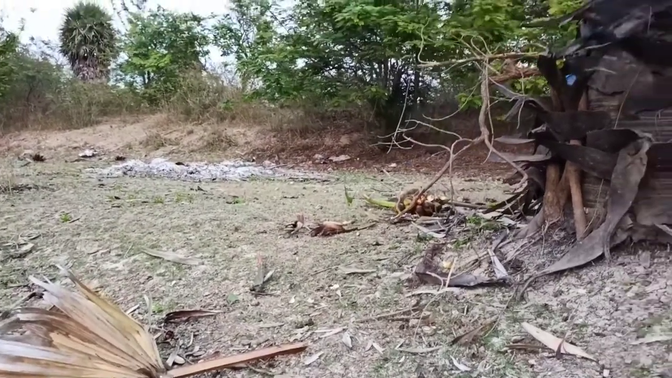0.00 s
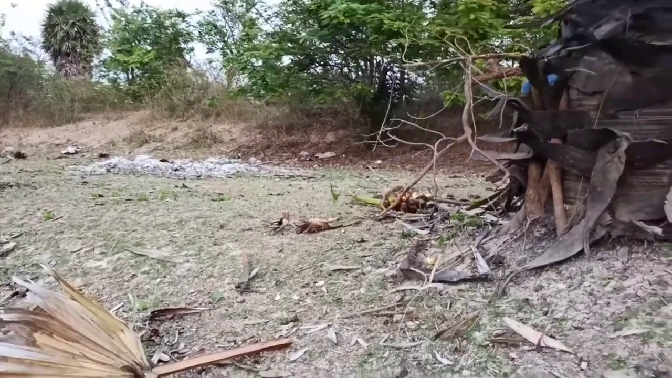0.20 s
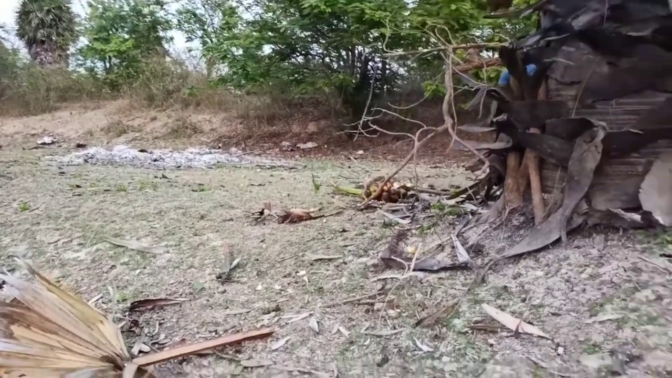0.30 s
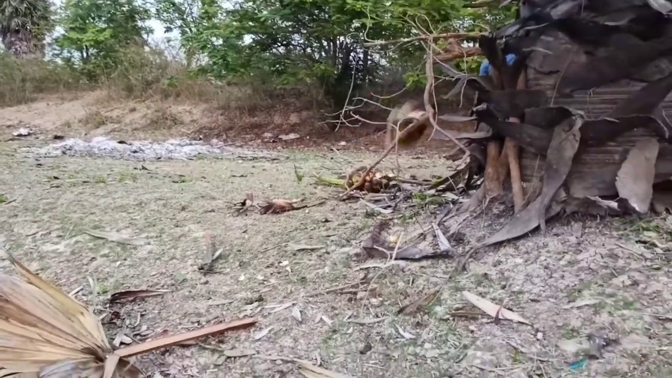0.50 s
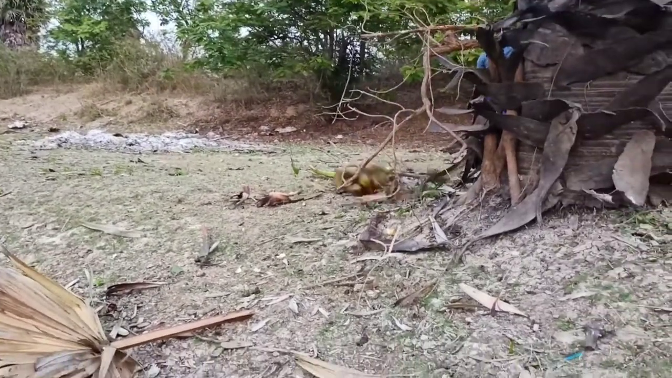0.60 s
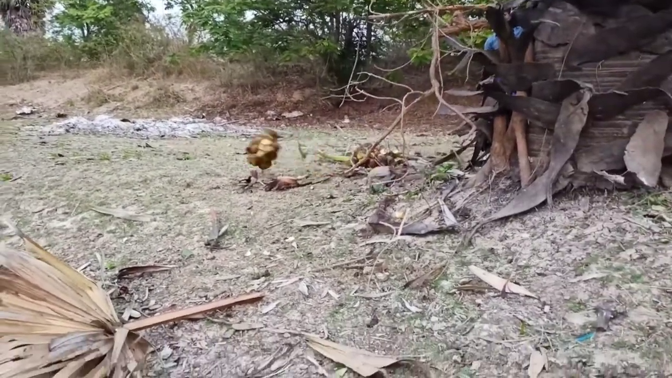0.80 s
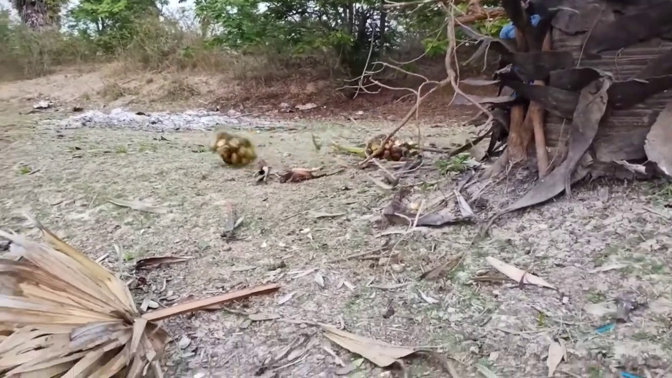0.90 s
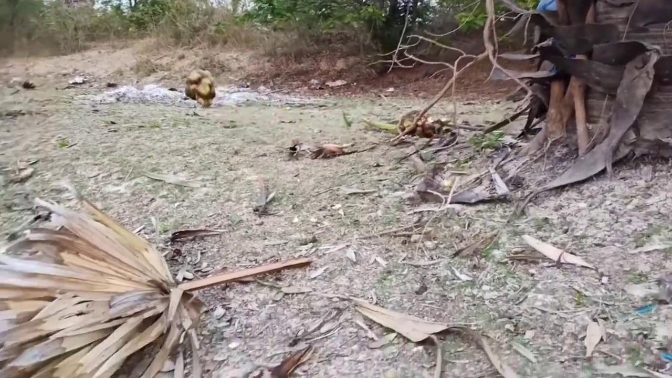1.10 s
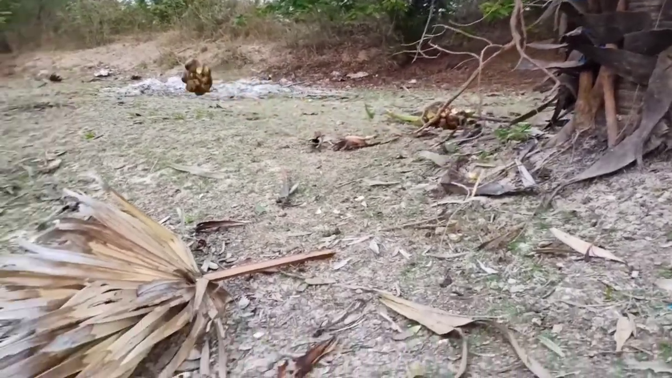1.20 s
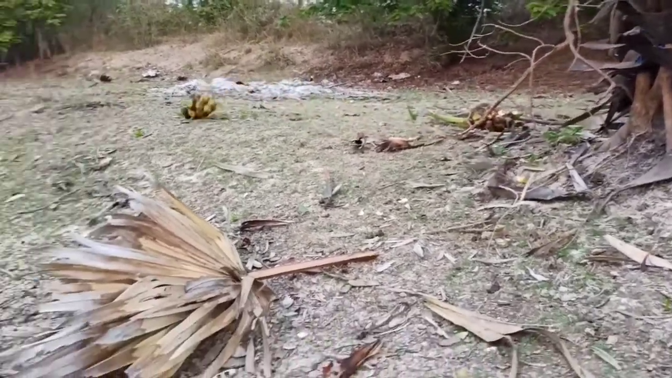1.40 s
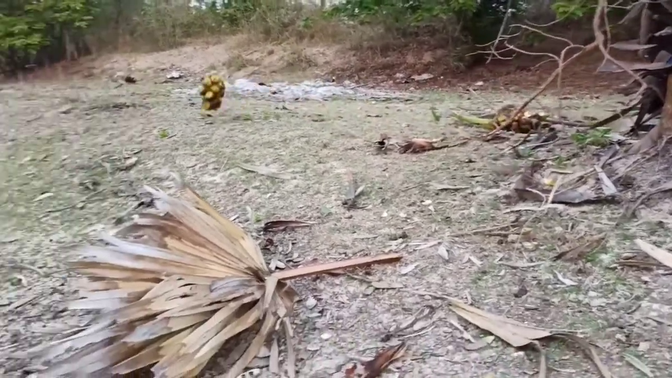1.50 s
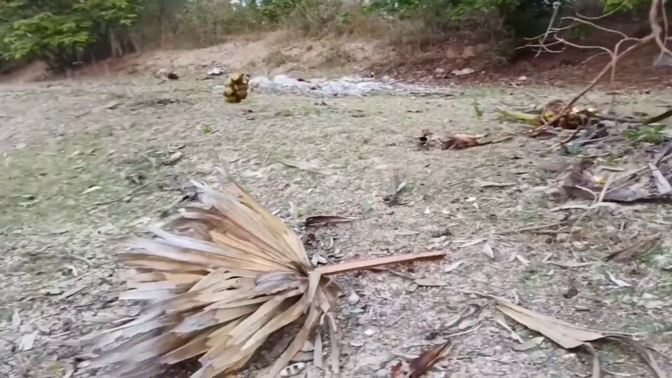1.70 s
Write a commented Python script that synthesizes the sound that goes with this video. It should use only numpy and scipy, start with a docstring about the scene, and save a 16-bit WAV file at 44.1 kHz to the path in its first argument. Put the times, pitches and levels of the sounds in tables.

```python
"""Under quiet open air, coloured noise, a heavy fruit bunch drops through dead fronds on a palm trunk.
Dry leaf crackles as a crowd of tiny fractures, hollow stalks knock as short decaying modes, and twigs
and leaf ribs snap in bursts of fractures that ring the broken piece, on through the whole scene.
The bunch lands, bounces and rolls away: low thuds and rumble, crunching and rustling litter, knocks
on a woody stem, and a clatter of fruits at three landings. A short scatter of echoes follows it all."""
import sys
import numpy as np
from scipy import signal
from scipy.fft import rfft, irfft, next_fast_len
from scipy.io import wavfile

SR = 44100
rng = np.random.default_rng(int(sys.argv[2]) if len(sys.argv) > 2 else 0)


def generate_wav(sig):
    """Save sig (samples, or channels by samples) to the path in sys.argv[1] as 16-bit PCM at SR."""
    pcm = np.round(np.clip(np.atleast_2d(sig).T, -1, 1) * 32767).astype(np.int16)
    wavfile.write(sys.argv[1], SR, pcm)


N = 79380
T = np.arange(N) / SR

# Shaking of the hanging fronds. Each row: time in seconds, leaf level in dB, stalk rattle level in dB.
SHAKE = [(0, -54.5, -90), (.165, -91, -90), (.175, -51, -47), (.197, -44.5, -36.5), (.204, -33.5, -37.5),
         (.265, -27, -26), (.295, -33, -30), (.315, -40.5, -46), (.336, -42.5, -53), (.355, -23, -20),
         (.415, -20, -26.5), (.452, -22, -19), (.475, -25, -31), (.505, -31.5, -35.5), (.54, -44, -47.5),
         (.6, -40.5, -50), (.7, -57, -71)]
# Tone colour of crushed dry litter. Each row: frequency in Hz, gain in dB.
LITTER = [(150, 1.5), (400, -4), (800, 0), (1100, -6), (1600, -5), (3000, -5.5), (4500, -2), (6800, 0.5),
          (8500, -7), (10500, -15.5), (15500, -13.5)]


def undb(db):
    """Decibels to gain."""
    return 10 ** (np.asarray(db) / 20)


def unit(x):
    """Scale to rms 1."""
    return x / np.sqrt(np.mean(x ** 2) + 1e-18)


def add(out, s, x):
    """Mix x into out from time s in seconds."""
    i = int(s * SR)
    out[i:i + len(x)] += x[:len(out) - i]


def curve(table, column):
    """Gain over time, gliding in dB between the rows of one column."""
    rows = np.array(table)
    return undb(np.interp(T, rows[:, 0], rows[:, column]))


def colour(x, points, centre_hz=None):
    """Causal filter through (Hz, dB) points, with an optional broad resonance."""
    resonance_octaves, skirt_db = 0.51, -13.5  # width of the resonance; level far away from it
    size = next_fast_len(len(x) + 2048, real=True) // 2 * 2
    octave = np.log2(np.arange(size // 2 + 1) * SR / size + 1)
    rows = np.array(points)
    gain = undb(np.interp(octave, np.log2(rows[:, 0]), rows[:, 1]))
    if centre_hz:
        distance = (octave - np.log2(centre_hz)) / resonance_octaves
        gain = gain * (undb(skirt_db) + np.exp(-.5 * distance ** 2))
    # fold the cepstrum forward in time: minimum phase, so nothing sounds ahead of its cause
    cepstrum = irfft(np.log(gain))
    cepstrum[1:size // 2] *= 2
    cepstrum[size // 2 + 1:] = 0
    return irfft(rfft(x, size) * np.exp(rfft(cepstrum)))[:len(x)]


def grains(n, rate, spread_db):
    """Tiny fractures at random moments, rate per second, with random signs and sizes, at rms 1."""
    when, sign, size = rng.random((3, n))
    happens = when < rate / SR
    size_db = spread_db * np.minimum(-np.log(1 - size), 4)  # capped exponential spread
    return unit(happens * np.sign(sign - .5) * undb(size_db))


def ring(hz, rise, t60):
    """One mode, pushed for a moment and then dying away."""
    t = T[:SR // 4]
    push = np.sin(np.pi / 2 * np.minimum(t / rise, 1)) ** 2
    decay = np.exp(-np.log(1000) * np.maximum(t - rise, 0) / t60)
    return push * decay * np.sin(2 * np.pi * hz * t)


def ping(hz, t60):
    """A freely dying sine."""
    t = T[:SR // 10]
    return np.sin(2 * np.pi * hz * t) * undb(-60 * t / t60)


def excite(x, hz, t60):
    """One resonance driven by x, at rms 1."""
    return unit(signal.fftconvolve(x, ping(hz, t60))[:len(x)])


def burst(length, release, rate, spread_db):
    """A bunch of fractures that sags a little over its length and then dies out."""
    t = T[:SR // 10]
    envelope = np.exp(-np.maximum(t - length, 0) / release - .5 * np.minimum(t / length, 1))
    return envelope * grains(len(t), rate, spread_db)


def held(x, db, length):
    """Scale a burst to the energy of that level held for that length."""
    return undb(db) * x * np.sqrt(length * SR / np.sum(x ** 2))


def flutter():
    """A gain that jumps each time the leaf lets go and quickly falls back to a steady rustle."""
    fits_per_s, release_s, steady_db = 260, .0025, -2.5
    jumps = grains(N, fits_per_s, spread_db=1.8) ** 2
    power = signal.lfilter([1], [1, -np.exp(-2 / (release_s * SR))], jumps)
    return np.sqrt(power / np.mean(power) + undb(steady_db) ** 2)


def crackle(points, rate, spread_db, shred_db, shred_rate, count=28):
    """Dry leaf: fine fractures mixed with ticks of shreds that each have their own pitch."""
    low_hz, high_hz, shred_t60_s = 1247, 8080, 0.016
    pitches = low_hz + (high_hz - low_hz) * (np.arange(count) + rng.random(count)) / count
    shreds = sum(excite(grains(N, shred_rate, spread_db=2.5), hz, shred_t60_s) for hz in pitches)
    leaf = grains(N, rate, spread_db) + undb(shred_db) * unit(shreds)
    return unit(flutter() * colour(leaf, points))


def breaks(table, release, rate, spread_db, piece_db):
    """Dry fibres give way in a burst of fractures that sets the broken piece ringing."""
    # Tone colour of breaking fibre. Each row: frequency in Hz, gain in dB.
    fibre = [(100, -20), (400, -9), (800, -5), (1600, 2), (4000, -0.5), (7200, 3), (8800, -7), (11000, -3),
             (15500, -9)]
    first_crack_db, piece_t60_s = -3, .018
    out = np.zeros(N)
    for s, db, hz, length, piece_hz in table:
        cracks = burst(length, release, rate, spread_db)
        cracks[0] += undb(first_crack_db)  # the fracture that starts the burst
        piece = undb(piece_db) * excite(cracks, piece_hz, piece_t60_s)
        add(out, s, held(unit(colour(cracks, fibre, hz)) + piece, db, length))
    return out


def air():
    """Quiet open air: steady noise, strongest in the low and middle range."""
    # Tone colour of the air. Each row: frequency in Hz, gain in dB.
    air_colour = [(30, -29), (168, -1), (360, -7), (505, -2), (830, -6), (996, -13), (1870, -12),
                  (2990, -21), (7080, -19), (8720, -60)]
    level_db = -64.5
    return undb(level_db) * unit(colour(rng.standard_normal(N), air_colour))


def leaves():
    """Dead fronds crackle as they are shaken."""
    # Tone colour of hanging leaf. Each row: frequency in Hz, gain in dB.
    leaf_colour = [(100, -6), (300, 5.5), (700, -3.5), (1100, 1), (1700, -4), (3000, -1.5), (4500, -2),
                   (6800, -0.5), (8500, -3), (10500, -6.5), (15500, -9.5)]
    return curve(SHAKE, column=1) * crackle(leaf_colour, rate=9600, spread_db=3, shred_db=-0.5, shred_rate=190)


def stalks():
    """The bunch strikes hollow stalks, each a set of decaying modes, amid a rattle of small contacts."""
    # Knocks, deep on the hollow stalks and high on the thin.
    # Each row: start in seconds, pitch in Hz, level in dB, rise in seconds, t60 in seconds.
    knocks = [(.172, 402, -26.5, 0.0033, 0.048), (.2335, 839, -14.5, 0.0069, 0.048),
              (.2354, 405, -2, 0.0066, 0.026), (.261, 355, -10.5, 0.014, 0.04),
              (.283, 391, -14.5, 0.0037, 0.12), (.336, 380, -3.5, 0.0032, 0.11),
              (.345, 438, -20, 0.008, 0.051), (.346, 1356, -14, 0.0034, 0.017),
              (.3465, 2670, -10, 0.0031, .022), (.3925, 436, -10.5, 0.0078, 0.062),
              (.410, 440, -8, 0.0047, 0.033), (.418, 581, -10.5, 0.002, 0.13),
              (.432, 506, -12.5, 0.0053, 0.027), (.4435, 737, -8.5, 0.0036, 0.019),
              (.455, 355, -18.5, 0.0054, 0.08), (.499, 360, -24, 0.0062, 0.033),
              (.680, 527, -17, 0.003, 0.02)]
    # Modes of a stalk. Each row: multiple of the pitch, level in dB, share of the knock's t60.
    modes = [(1, -0.5, 0.87), (1.3, -18.5, 0.86), (1.95, -15.5, 0.62), (2.2, -16, 0.83), (3.45, -23, 0.77),
             (4.4, -54, 0.76)]
    # Tone colour of the rattling stalks. Each row: frequency in Hz, gain in dB.
    rattle_colour = [(150, -31.5), (280, -10.5), (350, 4.5), (450, 3), (570, 2.5), (640, -14.5), (760, 3),
                     (1000, -21.5), (2000, -22), (5000, -82)]
    out = np.zeros(N)
    for s, hz, db, rise, t60 in knocks:
        for multiple, mode_db, share in modes:
            mode_rise = rise * min(1, 1 / multiple)  # higher modes speak sooner
            add(out, s, undb(db + mode_db) * ring(hz * multiple, mode_rise, t60 * share))
    rattle = unit(colour(grains(N, rate=1000, spread_db=6), rattle_colour))
    return out + curve(SHAKE, column=2) * rattle


def snaps():
    """Twigs and leaf ribs snap: very short, dense bursts of fractures."""
    # Each row: start in seconds, level in dB, centre in Hz, length in seconds, pitch of the piece in Hz.
    snap_rows = [(.2005, -33, 3800, 0.0087, 2870), (.2712, -9.5, 5640, 0.0026, 6820),
                 (.3465, -15, 7500, 0.0031, 6800), (.369, -8.5, 6860, 0.0018, 7240),
                 (.3695, -16, 2320, 0.0027, 2370), (.377, -20, 6440, 0.004, 6400),
                 (.4125, -13.5, 2060, 0.0016, 1730), (.4125, -17, 6650, 0.002, 5400),
                 (.437, -17.5, 3400, 0.0022, 3790), (.4455, -17, 1830, 0.0059, 1760),
                 (.447, -11, 5800, 0.00095, 6500), (.460, -12, 5400, 0.00069, 6170),
                 (.526, -29.5, 7400, 0.0093, 7060), (.602, -27, 4600, 0.0048, 4900),
                 (.623, -24.5, 6850, 0.0055, 5740), (.6425, -21.5, 4940, 0.0033, 3560),
                 (.6655, -24, 5300, 0.0039, 5350), (.6815, -10.5, 5440, .0055, 4090),
                 (.757, -25, 2080, 0.0017, 1570), (.881, -29.5, 5270, 0.0041, 5940),
                 (.8955, -32, 4800, .004, 4200), (.902, -23.5, 4900, 0.0013, 4050),
                 (.9175, -27, 4540, 0.0096, 5170), (.933, -27, 3920, 0.006, 2410),
                 (.9445, -27, 4800, 0.0038, 5800), (.9502, -20, 4500, 0.0045, 3660),
                 (1.0315, -30, 3330, 0.0045, 4000), (1.0625, -23, 2540, 0.0017, 2250),
                 (1.075, -24, 5370, 0.0058, 6480), (1.09, -32, 5500, 0.004, 6100),
                 (1.116, -34, 5500, 0.0087, 6100), (1.1435, -33, 5600, 0.003, 6200),
                 (1.1635, -24, 5630, 0.0056, 2570), (1.239, -23, 5900, 0.0043, 5480),
                 (1.296, -14, 7260, 0.003, 7450), (1.4228, -32.5, 4350, 0.0045, 5900),
                 (1.4513, -22.5, 7040, 0.0016, 5900), (1.5922, -22, 4400, 0.0045, 3010),
                 (1.623, -29, 2630, 0.0027, 3400), (1.6375, -32, 3660, 0.006, 3720),
                 (1.698, -28.5, 3980, 0.0012, 5650)]
    return breaks(snap_rows, release=.0012, rate=12000, spread_db=1.5, piece_db=-3.5)


def ground():
    """Dull thuds and rumble of the tumbling bunch, and litter rustling under it."""
    # Thuds of the bunch's weight. Each row: start in seconds, pitch in Hz, level in dB, t60 in seconds.
    thuds = [(0.266, 147, -19, 0.083), (0.282, 125, -15.5, 0.011), (.338, 211, -21.5, 0.15),
             (0.499, 180, -33.5, 0.17), (0.617, 101, -28.5, 0.076), (0.671, 230, -25.5, 0.041),
             (0.701, 71.6, -23, 0.06), (.7425, 239, -12.5, 0.019), (0.7548, 205, -17, 0.01),
             (0.776, 74, -36, 0.32), (0.827, 99.5, -28, 0.17), (0.872, 119, -18.5, 0.073),
             (.894, 97, -19, 0.067), (0.937, 92, -26, 0.16), (1.044, 180, -13.5, 0.011),
             (1.056, 120, -20, 0.031), (1.062, 70.4, -24.5, 0.16), (1.125, 99, -27, 0.24),
             (1.16, 68.4, -23.5, 0.072), (1.481, 93, -33.5, 0.31), (1.508, 281, -26.5, 0.061),
             (1.521, 99, -25.5, 0.047)]
    # The bunch scuffing over the ground. Each row: time in seconds, litter level in dB, rumble level in dB.
    roll = [(0, -65.5, -65.5), (.17, -66.5, -63), (.29, -74, -28), (.4, -54, -49), (.55, -40.5, -46),
            (.655, -39, -32.5), (.685, -21, -27.5), (.75, -30.5, -62), (.785, -39, -48), (.87, -36.5, -37),
            (.935, -35, -42), (.975, -38, -40.5), (1.06, -34, -32), (1.1, -43, -53), (1.165, -39.5, -36.5),
            (1.215, -44.5, -44), (1.26, -40.5, -46.5), (1.335, -46.5, -42), (1.39, -43, -53.5),
            (1.47, -49, -48), (1.53, -41.5, -57), (1.575, -47, -47.5), (1.64, -42, -49), (1.73, -52.5, -52),
            (1.8, -76, -58)]
    # Tone colour of the rumble. Each row: frequency in Hz, gain in dB.
    rumble_colour = [(25, -14), (48, -7), (66, -4), (110, -2), (200, -3), (300, -10), (500, -16.5),
                     (1500, -68.5)]
    rise_s, overtone_ratio, overtone_db = 0.0045, 1.636, -11.5
    out = np.zeros(N)
    for s, hz, db, t60 in thuds:
        overtone = undb(overtone_db) * ring(hz * overtone_ratio, rise_s, t60 / 2)
        add(out, s, undb(db) * (ring(hz, rise_s, t60) + overtone))
    rumble = unit(colour(grains(N, rate=550, spread_db=-1.5), rumble_colour))
    litter = crackle(LITTER, rate=5500, spread_db=1.5, shred_db=-5.5, shred_rate=78)
    return out + curve(roll, column=2) * rumble + curve(roll, column=1) * litter


def crunches():
    """Crushed litter crunches: sparser fractures that die out more slowly than a snap."""
    # Each row: start in seconds, level in dB, centre in Hz, length in seconds, pitch of the piece in Hz.
    crunch_rows = [(.337, -27.5, 2230, 0.011, 810), (.394, -16.5, 3580, 0.0015, 1640),
                   (.673, -28, 3100, 0.028, 1300), (.989, -31, 3730, 0.0066, 4430),
                   (1.128, -35.5, 3220, 0.012, 1650), (1.3555, -37.5, 6400, 0.025, 6900)]
    return breaks(crunch_rows, release=0.0068, rate=4600, spread_db=3.0, piece_db=-5)


def stem():
    """Knocks on a woody stem lying on the ground; a longer contact weakens the high modes."""
    # Each row: start in seconds, level in dB, contact time in seconds.
    stem_knocks = [(.603, -24, .0001), (.852, -34.5, 0.0012), (.934, -32.5, 0.0013)]
    # Modes of the stem. Each row: frequency in Hz, level in dB, t60 in seconds.
    modes = [(644, -3, 0.061), (763, 0, 0.041), (846, -11, 0.12), (1670, -1.5, .035), (2170, 3, 0.02),
             (2360, 2, 0.016), (2820, -10, .02)]
    rise_s = .002
    out = np.zeros(N)
    for s, db, contact in stem_knocks:
        for hz, mode_db, t60 in modes:
            softening = 1 + (hz * contact / 2) ** 4
            add(out, s, undb(db + mode_db) / softening * ring(hz, rise_s, t60))
    return out


def fruits():
    """Hard fruits clatter together at landings, each resonance struck by its own contacts."""
    # Each row: start in seconds, level in dB, length in seconds.
    clatters = [(.746, -22, 0.0057), (1.046, -20, 0.0067), (1.4988, -24, 0.018)]
    # Resonances of the fruits. Each row: frequency in Hz, level in dB.
    resonances = [(1540, 12), (1640, 4.5), (1880, 3), (2180, 9.5), (2600, 1.5), (4200, 8.5), (4950, 4),
                  (5600, 5), (6600, -15)]
    release_s, fruit_t60_s = 0.01, .024
    crackle_hz, crackle_db = 4200, -1.5
    low_hz = 1150  # small fruits radiate little below this
    low_cut = signal.butter(2, low_hz, "high", fs=SR, output="sos")
    out = np.zeros(N)
    for s, db, length in clatters:
        contacts = [burst(length, release_s, rate=780, spread_db=1.5) for _ in resonances]
        shells = sum(undb(d) * excite(x, hz, fruit_t60_s) for x, (hz, d) in zip(contacts, resonances))
        shells = unit(signal.sosfilt(low_cut, shells))
        contact_crackle = undb(crackle_db) * unit(colour(sum(contacts), LITTER, crackle_hz))
        add(out, s, held(shells + contact_crackle, db, length))
    return out


def scatter(dry):
    """A short scatter of echoes: a swiftly rising, decaying noise tail on every sound of the bunch."""
    level_db, t60_s, rise_s = -18, .055, 0.0039
    t = T[:SR // 2]
    echoes = rng.standard_normal(len(t)) * undb(-60 * t / t60_s) * np.minimum(t / rise_s, 1)
    echoes /= np.sqrt(np.sum(echoes ** 2))
    return undb(level_db) * signal.fftconvolve(dry, echoes)[:N]


def scene():
    """All sources, their scattered echoes and the open air."""
    dry = leaves() + stalks() + snaps() + ground() + crunches() + stem() + fruits()
    return (dry + scatter(dry) + air())[None]


def record(dry):
    """Thins the deep bass, clips at full scale and cuts the top of the treble."""
    low_cut_hz, top_hz = 57.6, 15700
    x = signal.sosfilt(signal.butter(2, low_cut_hz, "high", fs=SR, output="sos"), dry)
    treble_cut = signal.ellip(10, .2, 70, top_hz, fs=SR, output="sos")
    return signal.sosfilt(treble_cut, np.clip(x, -1, 1))


dry = scene()
out = record(dry)
generate_wav(out)
```